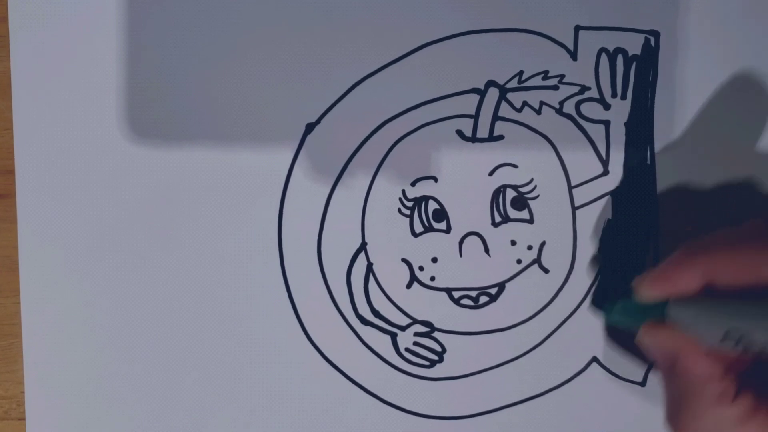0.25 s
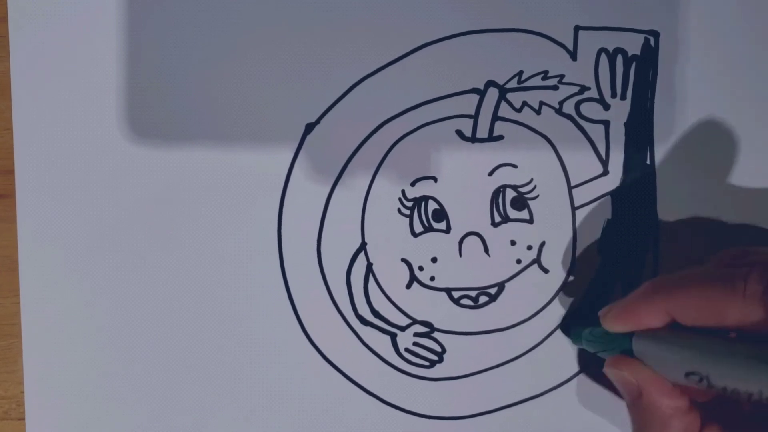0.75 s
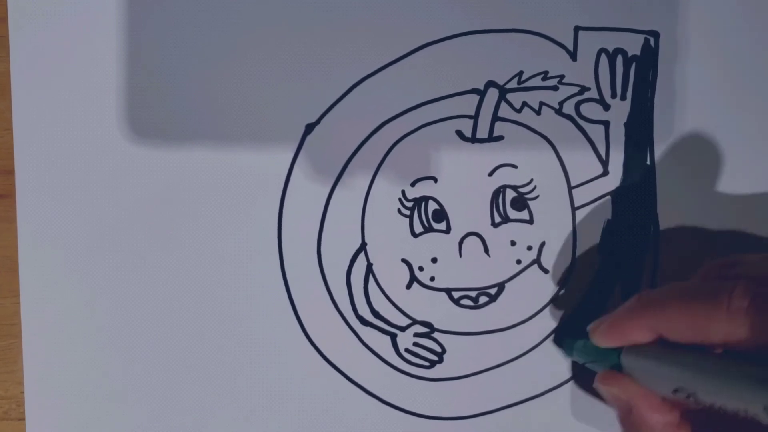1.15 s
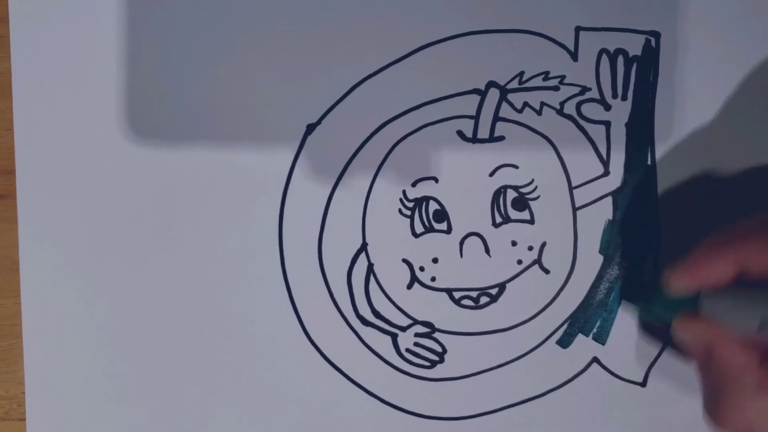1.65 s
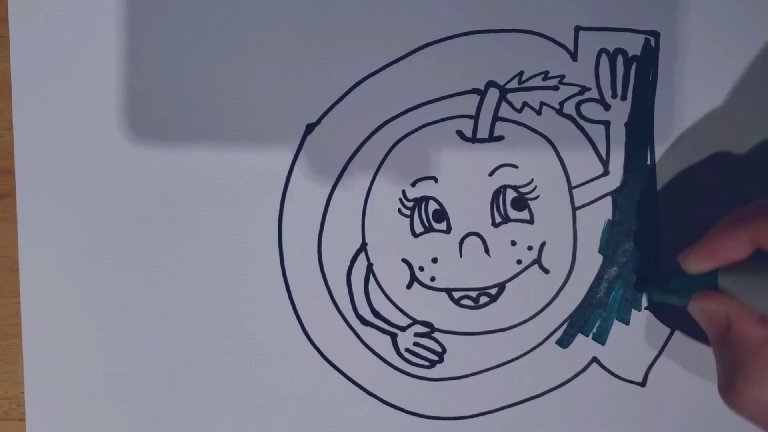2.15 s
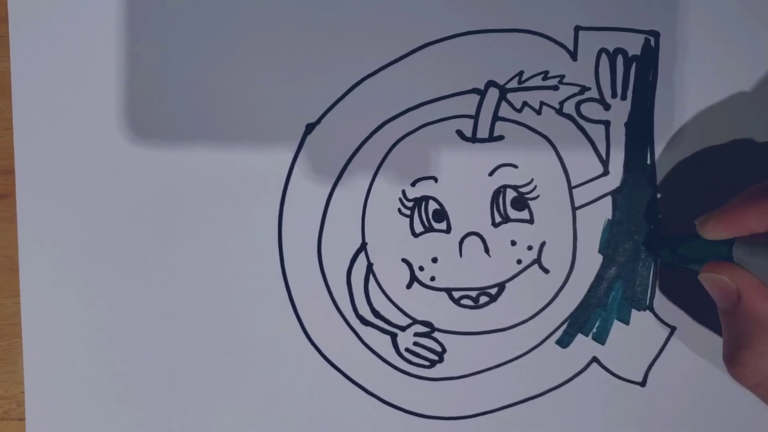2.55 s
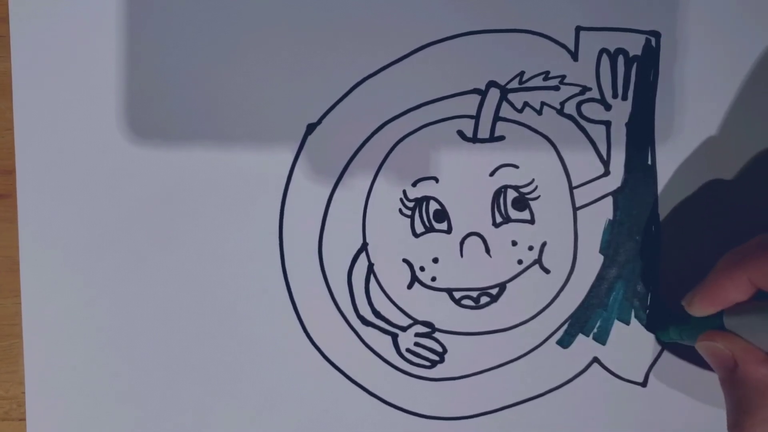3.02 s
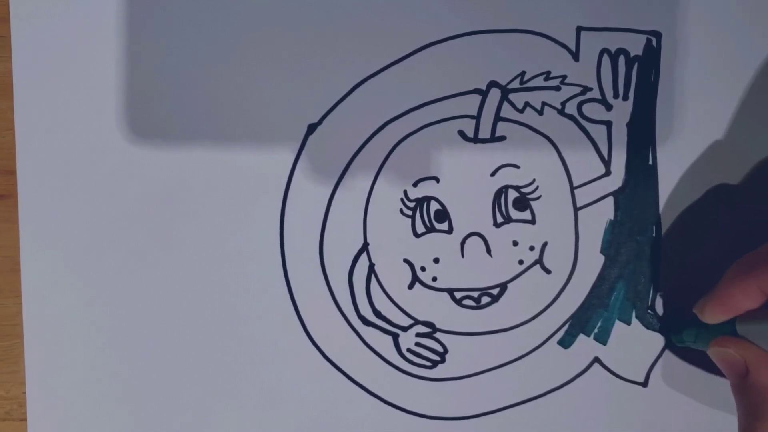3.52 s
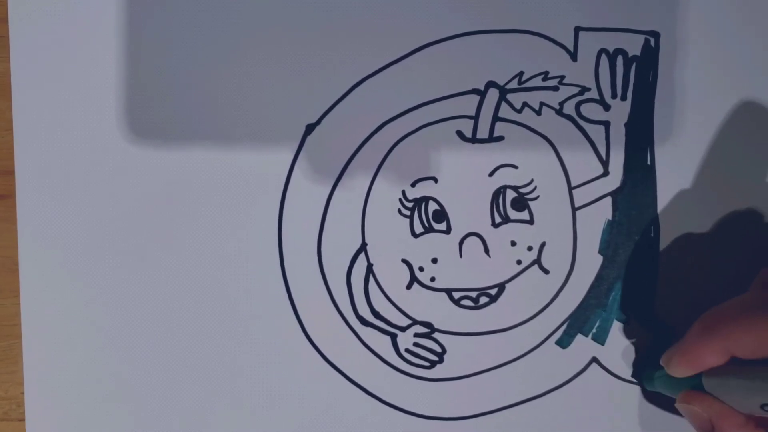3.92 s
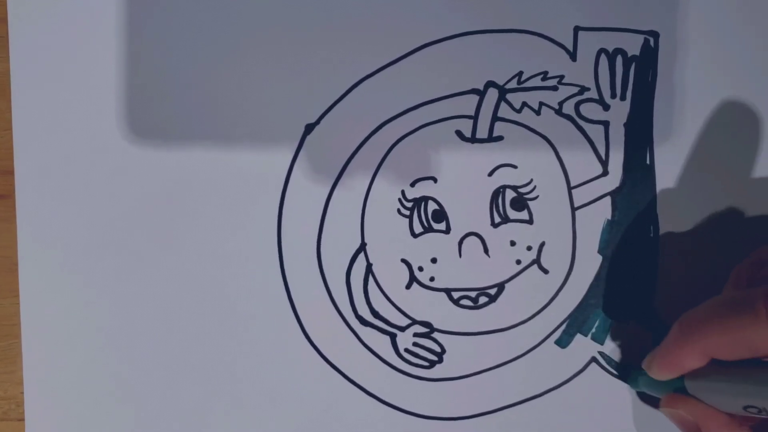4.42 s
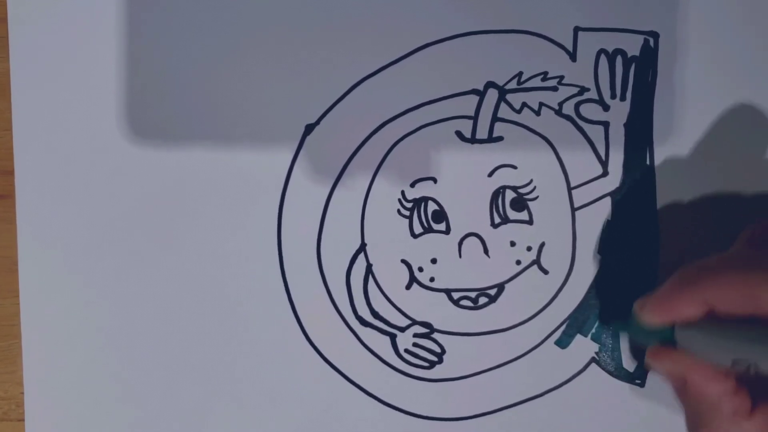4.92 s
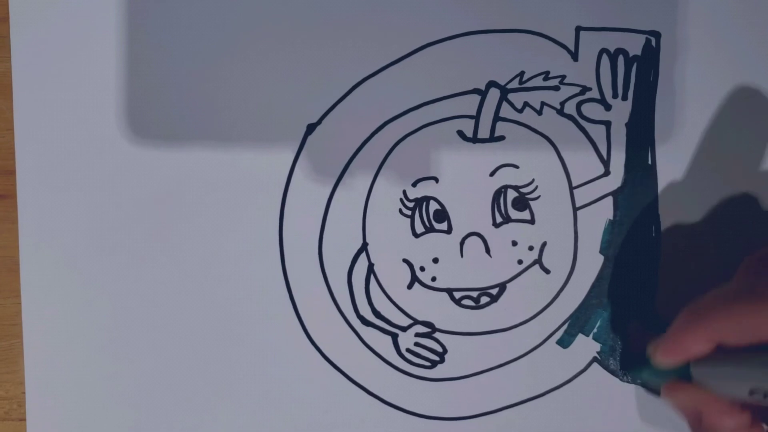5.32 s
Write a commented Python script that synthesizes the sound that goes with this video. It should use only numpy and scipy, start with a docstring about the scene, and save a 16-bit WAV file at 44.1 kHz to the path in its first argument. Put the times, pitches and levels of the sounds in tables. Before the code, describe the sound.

A felt-tip marker scribbles on a sheet of paper lying on a wooden desk, heard very close in stereo in a small quiet room. The sound is a bright, dry, grainy hiss with a papery scrape, leaning left, cut into short strokes that jerk loose, swell slightly and drop at each turn. From 0 to 1.4 s strokes last about 0.2 s; from 1.5 to 2.8 s they quicken to about eight per second. Around 2.8-3.1 s they turn softer, then run uneven and slower until 4.7 s, and end in fast, stronger strokes to 5.5 s. Nib pressure makes the desk ring faintly hollow, around 400 Hz, with rasping and small muffled knocks. Soft low wrist bumps are clearest near 1.5-1.6, 2.7 and 5.4 s. Gentle rubs, perhaps the palm, pass at 2.7-3.1 and 4.75-5.0 s. A very faint rumble and wavering hum remain underneath.

```python
"""Felt-tip scribbling on paper

A felt-tip marker scribbles back and forth on a sheet lying on a wooden desk in a quiet small room.
Nib: dense clicks on paper fibres through sheet and nib modes, a hiss that drops at every turn of the hand.
Desk: top modes rung by nib pressure, knocks and wrist bumps; twice a soft rub crosses the scribbling.
Two close ports differ in colour and desk echoes; a lumpy rumble and a wavering hum lie below.
"""
import sys
import numpy as np
from scipy import signal
from scipy.fft import rfft, irfft
from scipy.io import wavfile
from scipy.ndimage import uniform_filter1d, map_coordinates

SR = 44100
rng = np.random.default_rng(int(sys.argv[2]) if len(sys.argv) > 2 else 0)


def digitize_waveform(pressure):
    """Quantize a signal to 16-bit integers and store it at the path in sys.argv[1].

    Rows of a 2-D input are taken as channels; values are limited to [-1, 1].
    """
    field = np.atleast_2d(pressure).T
    bounded = np.clip(field, -1, 1)
    quanta = np.round(bounded * 32767).astype(np.int16)
    wavfile.write(sys.argv[1], SR, quanta)


N = 245460

# Strokes: turn_s, speeding_up_ms, slowing_before_next_turn_ms, early_hiss_drive_db, late_hiss_drive_db,
# desk_pressure_db (only its swing counts), dull_rasp_db, bright_rasp_db
STROKES = [(-0.03, 53, 51, -43, -41, -16.5, -27, -21), (0.17, 10, 34, -48, -47.5, -23.5, -41, -49),
           (0.269, 38, 47, -43, -41, -23, -23, -43), (0.435, 27, 41, -43, -43, -24, -53, -27.5),
           (0.61, 16, 68, -43, -37, -11.5, -23, -23.5), (0.841, 34, 49, -41.5, -43.5, -18, -25, -24.5),
           (1.034, 37, 28, -44, -37.5, -21.5, -25, -18.5), (1.23, 43, 32.6, -38.5, -40, -24.5, -48, -17.5),
           (1.404, 59, 35.5, -43, -36, -11, -62, -39), (1.545, 17, 35, -41, -44, -19, -50, -49),
           (1.675, 9.6, 49.6, -48.5, -32, -21.5, -53, -44), (1.8, 11, 41.5, -39, -41.5, -4, -50, -43),
           (1.934, 14.5, 42, -42.5, -34.5, -21, -24, -27.5), (2.043, 20, 45, -42, -43.5, -34, -46, -33),
           (2.173, 12, 50, -41.5, -37, -24.5, -26, -24.5), (2.281, 22, 32, -39, -43.5, -34, -43, -43),
           (2.401, 25, 45, -39, -36, -8, -56, -64), (2.53, 12, 36, -40.5, -44, -21, -37, -45),
           (2.651, 21, 54.4, -42, -35.5, -27.5, -56, -23), (2.772, 8.8, 34, -46.5, -53, -15, -29, -26),
           (2.838, 21, 103.5, -53, -44.5, -19.5, -25, -26), (2.993, 22, 57, -52, -54, -13, -25, -34),
           (3.122, 53, 61, -39.5, -41, -33, -32, -32), (3.248, 25, 56, -42, -49, -16.5, -32, -30),
           (3.375, 20, 55, -40, -41, -21.5, -41, -24.5), (3.485, 10, 113.5, -44, -42.5, -21, -23.5, -28.5),
           (3.643, 36, 49.4, -41, -37.5, -14, -19, -23), (3.796, 25, 39, -46, -49.5, -28, -30, -40),
           (3.92, 29, 128, -43.5, -41.5, -17.5, -21, -38), (4.135, 54.4, 65, -41, -34.5, -12, -28, -23.5),
           (4.339, 23, 62.6, -44, -45.5, -20.5, -29, -29.5),
           (4.509, 32.3, 60, -39.5, -34.5, -26, -29, -23.5), (4.666, 14, 37, -41.5, -42, -20, -29, -18.5),
           (4.76, 28, 38, -35, -38.5, -22, -42, -34), (4.872, 19.5, 31, -41.5, -40, -17.5, -21, -20),
           (4.977, 10, 39, -38, -36.5, -18, -58, -64), (5.081, 29, 46, -38, -34, -21.5, -38, -69),
           (5.198, 10.4, 36, -35.5, -38.5, -18, -60, -62), (5.305, 15, 43.6, -41, -33.5, -9, -59, -43),
           (5.421, 13, 32.5, -33.5, -41, -23, -54, -60), (5.523, 33.5, 70, -39, -16, -7, -60, -64)]
# Hand drifting down the sheet: time_s, top_brightness_db, nib_ring_lean_left_db, other_lean_left_db, scrape_db
POSTURE = [(0.0, -8, 13.5, 7, -11), (0.246, -1.5, 12.5, 7, -10.5), (0.8, 1.5, 8.5, 7.5, -10),
           (1.152, -2, 0.5, 9.5, -9.5), (1.499, 4.5, 10.5, 9, -11.5), (2.304, -3, 9.5, 8.5, -12),
           (2.7, -1.5, 6.5, 8.5, -11.5), (2.9, -5, 20, 7, -12), (3.3, -8, 14.5, 13.5, -10),
           (3.8, -2.5, 7, 3, -9.5), (4.15, 1.5, 14, 9.5, -7), (4.6, -16, 14, 12, -11),
           (4.901, -2, 16.5, 4.5, -8.5), (5.1, -5.5, 9, 10, -13.5), (5.57, 1, 17.5, 6, -9)]
# Modes of sheet and barrel: centre_hz, width_hz, left_db, right_db
SHEET_MODES = [(5356, 290, -5.5, 4), (6610, 230, 0.5, 0), (6200, 340, -6.5, 5.5), (9000, 1110, -3.5, 2.5),
               (9780, 560, 0.5, -4.5), (10680, 530, -4, 1.5), (11760, 640, -4, 0.5)]
# Nib ring: centre_hz, width_hz, left_db, right_db
NIB_MODES = [(7233, 600, 4.5, -64), (7660, 630, 2.5, -3)]
# Top brightness: centre_hz, width_hz, left_db, right_db
TOP_MODES = [(11840, 630, -13, -6), (13370, 150, -18, -10), (13240, 600, -29, 10.5), (12560, 570, 7.5, 11),
             (13550, 1850, 3.5, 1)]
# Scrape of the sheet: centre_hz, width_hz, left_db, right_db
SCRAPE_MODES = [(1950, 54, 4, -6), (2088, 186, -3, -7), (2835, 230, 2, -8), (3174, 353, 2.5, -4.5),
                (3820, 390, -17.5, -9), (4340, 380, 1, -9), (4870, 200, -19, -2.5)]
# Sheet mode that fades as the hand moves down: centre_hz, width_hz, left_db, right_db
FADING_MODE = [(2477, 270, -3, -4.5)]
# Gain of that mode: time_s, level_db
FADING_LEVEL = [(0, 1.5), (1.5, -0.5), (2.7, -2.5), (3.0, -16), (4.2, -12), (5.57, -12)]
# Desk top modes rung by nib pressure: centre_hz, width_hz, left_db, right_db
DESK_MODES = [(384.3, 21, 4, 0), (400, 8.3, -7.5, -10), (446.7, 15.4, -8.5, -17.5), (472, 20, -19, -30)]
# Nib pressure keeping the desk ringing: time_s, ring_level_db
PRESSING = [(0.0, -70.5), (0.14, -62.5), (0.18, -79), (0.37, -59.5), (0.59, -71), (0.81, -50),
            (0.85, -63.5), (1.12, -70), (1.21, -49.5), (1.27, -67.5), (1.35, -57), (1.42, -73.5),
            (1.5, -49), (1.6, -53), (1.71, -72), (1.75, -47.5), (1.8, -64), (1.89, -55.5), (1.94, -70),
            (2.01, -51), (2.06, -69), (2.29, -63), (2.39, -73), (2.48, -49), (2.54, -71), (2.59, -61.5),
            (2.65, -76), (2.7, -59.5), (2.82, -76), (2.88, -67), (2.96, -84), (3.05, -66), (3.11, -76.5),
            (3.29, -71), (3.33, -55), (3.38, -65.5), (3.44, -60), (3.47, -76), (3.58, -68.5), (3.61, -93),
            (3.69, -56.5), (3.77, -52.5), (3.84, -79.5), (4.03, -53.5), (4.12, -94), (4.19, -51),
            (4.29, -60.5), (4.34, -71.5), (4.46, -63.5), (4.5, -83), (4.56, -54), (4.67, -77), (4.7, -61.5),
            (5.04, -56.5), (5.09, -70), (5.16, -54.5), (5.32, -66.5), (5.36, -43), (5.44, -59),
            (5.57, -67.5)]
# Dull rasp of the desk: centre_hz, width_hz, left_db, right_db
DULL_RASP_MODES = [(616, 19.4, 6, -12), (646, 32.6, 0.5, -2), (784, 89, -4.5, -7), (860, 114, -2.5, -18),
                   (1005, 68, -14.5, -12.5)]
# Bright rasp of the desk: centre_hz, width_hz, left_db, right_db
BRIGHT_RASP_MODES = [(1208, 24.7, 6, -2), (1398, 91, 3.6, -8), (1532, 44, 4, 1.5), (1737, 91, 6.2, -26)]
# Band edges, dull rasp then bright: low_hz, high_hz
RASP_BANDS = [(570, 980), (1100, 1866)]
# Nib digging in as the hand brakes, knocking the desk: time_s, peak_drive_db
KNOCKS = [(0.378, -52), (0.4, -48), (0.72, -54.5), (.803, -50.5), (1.197, -50.5), (1.53, -52),
          (1.747, -50.5), (2.014, -57.5), (2.482, -53), (2.71, -61), (3.332, -54.5), (3.762, -50.5),
          (3.998, -53), (4.034, -57), (4.215, -55.5), (4.566, -69), (4.968, -67.5), (5.172, -62.5),
          (5.365, -59)]
# Reflections off desk and hand: mean_lag_ms, left_db, right_db
ECHOES = [(0.555, -24, -33), (0.27, -40, -13.5), (0.954, -13.5, -46), (0.557, -57, -6.5), (1.7, -4, -8)]
# Lowest desk modes, woken by the wrist: centre_hz, width_hz, left_db, right_db
WRIST_MODES = [(33.8, 27, -19, -14), (63.7, 23, -2.5, -0.5), (137, 88, 0, 3.5), (210, 58, 12, 6)]
# Wrist bumping the desk: time_s, peak_db
BUMPS = [(.3, -80), (.545, -72.5), (.77, -73), (.87, -67), (.95, -58), (1.15, -65.5), (1.36, -65),
         (1.495, -56), (1.615, -53.5), (1.75, -62.5), (2.0, -62), (2.48, -60.5), (2.71, -55.5),
         (3.33, -63.5), (3.74, -67), (4.23, -82), (4.93, -76), (5.16, -61), (5.25, -65.5), (5.375, -59),
         (5.47, -61.5)]
# Soft steady rubs, perhaps the palm sliding: start_s, length_s, level_db
SLIDES = [(2.728, 0.42, -66.5), (4.746, 0.28, -61)]
# Colour of the rub: centre_hz, width_hz, left_db, right_db
RUB_MODES = [(915, 280, 12.5, 0), (1400, 140, 22.5, 11.5), (1470, 490, 3, 3)]
# Colour of the rumble: frequency_hz, relative_density_db
RUMBLE_COLOUR = [(20, -14.5), (40, 12), (70, 31), (150, 12), (280, 28.5), (480, -39), (700, 5), (1050, -53),
                 (1400, -32), (2000, -30), (2900, -12), (4000, -13), (15000, -13)]

FIRST_TURN_DB, STILL_DB, LAST_TURN_S = -32, -76.5, 5.66  # hiss drive at first turn, with nib lifted
JERK_TIME, JERK_LEVEL = 0.62, 0.85  # nib breaks loose: share of speeding up, share of the rise in dB
ARCH_DB, SLOWING_DB_PER_S = 1.5, 443  # mid-stroke above the mean of its ends; fall towards the turn
DULLING_DB_PER_DB = 0.1  # strokes that swell lose top brightness
SCRAPE_FOLLOWS = 0.74  # share of the hiss swing
BEARING_DB, BEARING_FOLLOWS = 1, 0.16  # half the pressure swell per stroke; extra per dB of hiss swell
RASP_FOLLOWS, RASP_KEEPS = 0.65, 0.65  # share of pressure swing followed; of hiss swing not followed
RASP_RIDES = 0.18  # share of the quick swings of the desk ring
KNOCK_RISE_DB_PER_S, KNOCK_FALL_DB_PER_S, KNOCK_RASP_DB, KNOCK_DULL_HZ = 916, 579, -1, 657
DESK_STEADY, WRIST_STEADY = 0.45, 0.25  # how far steady drag evens out chance beats, 0-1
PORT_LAG_MS, TRAVEL_MS = 0.12, 0.043  # left port hears later; path change along a stroke
BUMP_RISE_DB_PER_S, BUMP_FALL_DB_PER_S, RESTING_DB = 308, 193, -82
DEEP_DB, DEEP_FOLLOWS = -80, 0.23  # two deepest modes hum on; share of the bump swing in them
SLIDE_EDGE_S = 0.078
ROOM_T60_S, ROOM_DB, WALL_CUT_HZ = 0.16, -2, 6800
DESK_ROOM_DB = -5.5  # drumming reaches the walls weaker than the hiss
RUMBLE_DB, HUM_HZ, HUM_DB = -83.5, 237.7, -80
CUTOFF_HZ = 14520


def marker():
    """One nib on paper drives both the airborne hiss and the desk under the sheet."""
    speed_db, moving, midway, slowing, swell_db = stroke_speed()
    clumps = from_db(0.35 * drift(130) + 0.5 * drift(31))
    slips = [from_db(speed_db) * fibres(per_s=14000, spread_db=2.0, clumps=clumps, own=0.09)
             for edge in range(2)]  # both edges of the nib
    hiss = nib_hiss(slips, speed_db, moving, slowing, swell_db)
    drumming = desk_drumming(slips, speed_db, moving, midway, slowing, swell_db)
    return hiss, drumming, nib_place()


def stroke_speed():
    """Drive of the hiss: each stroke jerks loose, arches, then dies at one rate towards the turn."""
    turn, rise_ms, fall_ms, early_db, late_db = np.transpose(STROKES)[:5]
    rise, fall = rise_ms / 1000, fall_ms / 1000
    moving = turn + rise
    slowing = np.append(turn[1:], LAST_TURN_S) - fall
    midway = (moving + slowing) / 2
    dying = np.minimum(fall, (late_db - STILL_DB) / SLOWING_DB_PER_S)
    end_db = late_db - SLOWING_DB_PER_S * dying
    rest_db = np.append(FIRST_TURN_DB, end_db[:-1])
    jerk_db = rest_db + JERK_LEVEL * (early_db - rest_db)
    arch_db = (early_db + late_db) / 2 + ARCH_DB
    times = np.c_[turn, turn + JERK_TIME * rise, moving, midway, slowing, slowing + dying]
    levels_db = np.c_[rest_db, jerk_db, early_db, arch_db, late_db, end_db]
    return through(times, levels_db, smooth_s=0.004), moving, midway, slowing, late_db - early_db


def nib_hiss(slips, speed_db, moving, slowing, swell_db):
    """Fibre slips ring sheet, nib and top modes; lower sheet modes add a scrape."""
    s, *posture = np.transpose(POSTURE)
    top_db, ring_lean_db, lean_db, scrape_db = [through(s, column, smooth_s=0.017) for column in posture]
    stroke_swell_db = through(np.c_[moving, slowing], np.c_[swell_db, swell_db], smooth_s=0.0088)
    top_gain = from_db(top_db - DULLING_DB_PER_DB * stroke_swell_db - 6.0)
    sheet = resonate(slips, SHEET_MODES, wander_db=3.0)
    sheet += top_gain * resonate(slips, TOP_MODES, wander_db=4.0)
    nib_ring = resonate(slips[::-1], NIB_MODES, wander_db=1.7)
    hiss = leaning(sheet, lean_db) + leaning(nib_ring, ring_lean_db)
    hiss = band(hiss, low_hz=5350, high_hz=19500)

    scrape_db = scrape_db + (SCRAPE_FOLLOWS - 1) * (speed_db - speed_db.mean())
    hiss += from_db(scrape_db + 6.0) * sheet_scrape(slips)
    return from_db(-1.36) * hiss


def sheet_scrape(slips):
    """Two groups of low sheet modes with a hollow between, where one fading mode sits."""
    fading_gain = from_db(through(*np.transpose(FADING_LEVEL), smooth_s=0.05))
    scrape = fading_gain * resonate(slips[::-1], FADING_MODE, wander_db=3.0)
    scrape += band(resonate(slips, SCRAPE_MODES[:2], wander_db=4.5), low_hz=1798, high_hz=2280)
    scrape += band(resonate(slips, SCRAPE_MODES[2:], wander_db=4.5), low_hz=2650, high_hz=5870)
    return band(scrape, low_hz=1670, high_hz=8400)  # sheet sheds little below its lowest mode


def desk_drumming(slips, speed_db, moving, midway, slowing, swell_db):
    """Pressure keeps the desk top ringing; slips and braking knocks make its higher modes rasp."""
    desk_db, *rasps_db = np.transpose(STROKES)[5:]
    taps = fibres(per_s=2500, spread_db=2.0, clumps=from_db(2.0 * drift(18.0)), own=0.012)
    ringing = band(resonate([taps], DESK_MODES, wander_db=2.0), low_hz=338.6, high_hz=534)
    ring_db = through(*np.transpose(PRESSING), smooth_s=0.0055)
    drumming = from_db(ring_db) * evened(ringing, DESK_STEADY, window_s=0.015)

    bearing_db = BEARING_DB + BEARING_FOLLOWS * swell_db
    times = np.c_[(moving + midway) / 2, (midway + slowing) / 2]
    pressure_db = through(times, np.c_[desk_db - bearing_db, desk_db + bearing_db], smooth_s=0.056)
    rasp_db = RASP_FOLLOWS * (pressure_db - pressure_db.mean()) - 6.0
    rasp_db -= RASP_KEEPS * (speed_db - speed_db.mean())
    rasp_db += RASP_RIDES * (ring_db - uniform_filter1d(ring_db, size=SR // 6))

    knocks = humps(KNOCKS, KNOCK_RISE_DB_PER_S, KNOCK_FALL_DB_PER_S, floor_db=-150)
    dulling = signal.butter(2, KNOCK_DULL_HZ, fs=SR, output="sos")
    thuds = signal.sosfilt(dulling, knocks * taps)  # soft nib dulls the blow

    rasp_modes = (DULL_RASP_MODES, BRIGHT_RASP_MODES)
    for modes, (low_hz, high_hz), level_db in zip(rasp_modes, RASP_BANDS, rasps_db):
        stroke_db = through(np.c_[moving, slowing], np.c_[level_db, level_db], smooth_s=0.0068)
        gain = from_db(rasp_db + stroke_db)
        drives = [gain * slip + from_db(KNOCK_RASP_DB) * thuds for slip in slips]
        drumming += from_db(21.5) * band(resonate(drives, modes, wander_db=5.0), low_hz, high_hz)
    return drumming


def nib_place():
    """Place along the stroke, 0 and 1 at alternate turns, with slow drift."""
    turn = np.transpose(STROKES)[0]
    return through(turn, np.arange(len(turn)) % 2, smooth_s=0.013) + 0.68 * drift(1.44)


def near_echoes(x, place):
    """Direct path and short reflections off desk and hand, their lags shifting as the nib travels."""
    out = np.array([delayed(x[0], PORT_LAG_MS + TRAVEL_MS * place, order=3), x[1]])
    for k, (ms, left_db, right_db) in enumerate(ECHOES):
        lag_ms = ms * (1 + 0.1208 * (-1) ** k * place)
        echo = np.array([delayed(port, lag_ms, order=1) for port in x])
        out += echo * from_db([[left_db], [right_db]])
    return out


def wrist():
    """Lumpy low pushes ring the lowest desk modes; each bump rises fast and dies away."""
    pushes = [fibres(per_s=230, spread_db=1.0, clumps=from_db(1.4 * drift(13.0)), own=0.96)]
    bumps = humps(BUMPS, BUMP_RISE_DB_PER_S, BUMP_FALL_DB_PER_S, RESTING_DB)
    deep = rms_one(band(resonate(pushes, WRIST_MODES[:2], wander_db=3.5), low_hz=22.7, high_hz=109))
    deep_gain = from_db(DEEP_DB + 3.5 * drift(8.2)) * (bumps / bumps.mean()) ** DEEP_FOLLOWS
    thumps = band(resonate(pushes, WRIST_MODES[2:], wander_db=2.5), low_hz=96, high_hz=338)
    return bumps * evened(thumps, WRIST_STEADY, window_s=0.024) + deep_gain * deep


def slide():
    """Steady friction: noise through low-middle resonances, faded in and out."""
    s, length, level_db = np.transpose(SLIDES)
    times = np.c_[s, s + SLIDE_EDGE_S, s + length - SLIDE_EDGE_S, s + length]
    gate = through(times, from_db(level_db)[:, None] * [0, 1, 1, 0], smooth_s=0.01)
    rub = rng.standard_normal(N) + 0.3 * rng.standard_normal((2, N))
    return gate * rms_one(band(resonate([rub], RUB_MODES, wander_db=2.5), low_hz=814, high_hz=1590))


def room(x, place):
    """Dense dying reflections, duller with time; their pattern turns over as the nib travels."""
    t = np.arange(int(ROOM_T60_S * SR)) / SR
    dense = rng.standard_normal((2, 2, SR))[..., :len(t)]
    dull = signal.sosfilt(signal.butter(1, WALL_CUT_HZ, fs=SR, output="sos"), dense)
    tails = dull + (dense - dull) * from_db(-90 * t / ROOM_T60_S)  # treble dies sooner
    tails = tails * from_db(-60 * t / ROOM_T60_S) * (t > 0.003)
    tails = tails / np.sqrt(np.sum(tails ** 2, axis=-1, keepdims=True))
    turned = [x * np.cos(2.0 * place), x * np.sin(2.0 * place)]
    return sum(signal.fftconvolve(part[None], tail, axes=1)[:, :N] for part, tail in zip(turned, tails))


def background():
    """Coloured noise, slightly shared by the ports, as lumpy rumble; a sine wavering in pitch and level."""
    hz = np.maximum(np.arange(N // 2 + 1) * SR / N, 1)
    point_hz, point_db = np.transpose(RUMBLE_COLOUR)
    colour = from_db(np.interp(np.log(hz), np.log(point_hz), point_db))
    white = rng.standard_normal((2, N)) + 0.077 * rng.standard_normal(N)
    rumble = rms_one(irfft(rfft(white) * colour, N)) * from_db(RUMBLE_DB + 5.6 * drift(6.0))
    hum_phase = 2 * np.pi * np.cumsum(HUM_HZ + 1.755 * drift(1.41)) / SR
    return rumble + np.sin(hum_phase) * from_db(HUM_DB + 5.8 * drift(9.9))


def fibres(per_s, spread_db, clumps, own):
    """Nib catching and slipping off fibres: uneven random clicks, shared plus each port's own share."""
    sizes_db = spread_db * np.minimum(rng.exponential(1, (3, N)), 5)
    sizes = from_db(sizes_db) * rng.choice([-1, 1], (3, N))
    shared, *apart = sizes * (rng.random((3, N)) < per_s / SR) * clumps
    return rms_one(shared + own * np.array(apart))


def resonate(drives, modes, wander_db):
    """Parallel resonances on alternating drives; each swells and fades as the contact point moves."""
    out = np.zeros((2, N))
    for k, (hz, width_hz, left_db, right_db) in enumerate(modes):
        r = np.exp(-np.pi * width_hz / SR)
        top = [(1 - r * r) / 2, 0, (r * r - 1) / 2]
        bottom = [1, -2 * r * np.cos(2 * np.pi * hz / SR), r * r]
        gain_db = wander_db * np.array([drift(11.2), drift(11.3)]) + [[left_db], [right_db]]
        out += signal.lfilter(top, bottom, drives[k % len(drives)]) * from_db(gain_db)
    return out


def band(x, low_hz, high_hz):
    """Steep edges around a group of modes."""
    return signal.sosfilt(signal.butter(4, [low_hz, high_hz], "band", fs=SR, output="sos"), x)


def humps(rows, rise_db_per_s, fall_db_per_s, floor_db):
    """Gain that rises to each peak and dies away, straight in dB, above a floor."""
    level_db, t = np.full(N, float(floor_db)), np.arange(N) / SR
    for s, peak_db in rows:
        drop_db = np.maximum(rise_db_per_s * (s - t), fall_db_per_s * (t - s))
        level_db = np.maximum(level_db, peak_db - drop_db)
    return from_db(level_db)


def evened(x, share, window_s):
    """Divides out a share of the level swings of a ringing; unit rms."""
    power = uniform_filter1d(np.mean(x ** 2, axis=0), size=max(1, int(window_s * SR)))
    return rms_one(x / (power + 0.026 * power.mean()) ** (np.clip(share, 0, 1) / 2))


def leaning(x, lean_db):
    """Splits a left-right level difference between the ports."""
    return x * from_db(lean_db * np.array([[0.5], [-0.5]]))


def delayed(x, ms, order):
    """Reads a signal with a lag that may change in time."""
    return map_coordinates(x, [np.arange(N) - ms * SR / 1000], order=order)


def drift(corner_hz):
    """Slow chance: noise twice through a one-pole low-pass, at SR / 40; unit rms."""
    r = np.exp(-80 * np.pi * corner_hz / SR)
    noise = rng.standard_normal(N // 40 + 2002)
    slow = signal.lfilter([1], [1, -2 * r, r * r], noise)[2000:]  # settled part
    return np.interp(np.arange(N) / 40, np.arange(len(slow)), rms_one(slow))


def through(times, values, smooth_s):
    """Straight lines through points in time, corners rounded."""
    line = np.interp(np.arange(N) / SR, np.ravel(times), np.ravel(values))
    return uniform_filter1d(line, size=max(1, int(smooth_s * SR)))


def from_db(db):
    """Decibels to gain."""
    return 10 ** (np.asarray(db) / 20)


def rms_one(x):
    """Scales to unit rms."""
    return x / np.sqrt(np.mean(x ** 2) + 1e-20)


def scene():
    """Marker with its echoes, wrist, slide, room and background."""
    hiss, drumming, place = marker()
    near = near_echoes(hiss, place)
    to_walls = near[1] + from_db(DESK_ROOM_DB) * drumming[1]  # right port feeds the room
    reverb = from_db(ROOM_DB) * room(to_walls, place)
    return near + drumming + wrist() + slide() + reverb + background()


def record(dry):
    """Steep low-pass cuts the top."""
    return signal.sosfilt(signal.cheby1(20, 0.5, CUTOFF_HZ, fs=SR, output="sos"), dry)


dry = scene()
out = record(dry)
digitize_waveform(out)
```